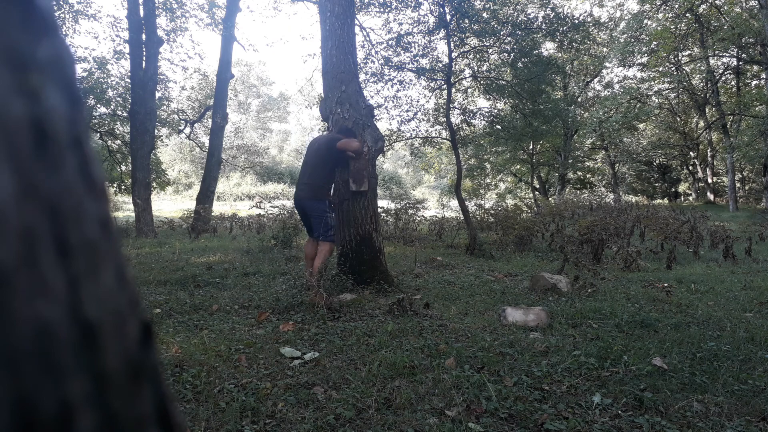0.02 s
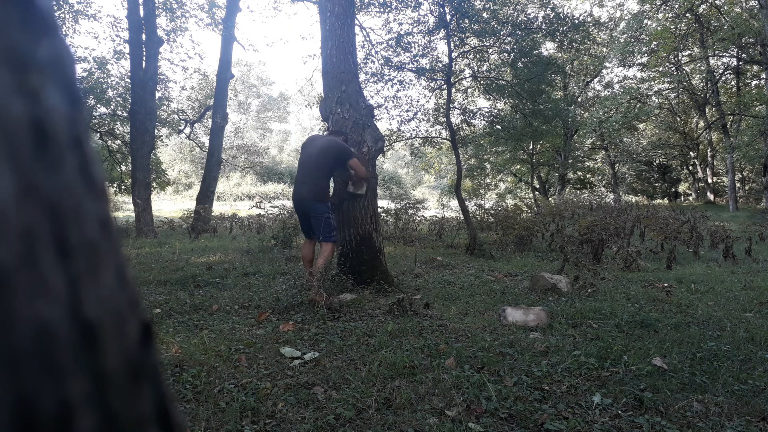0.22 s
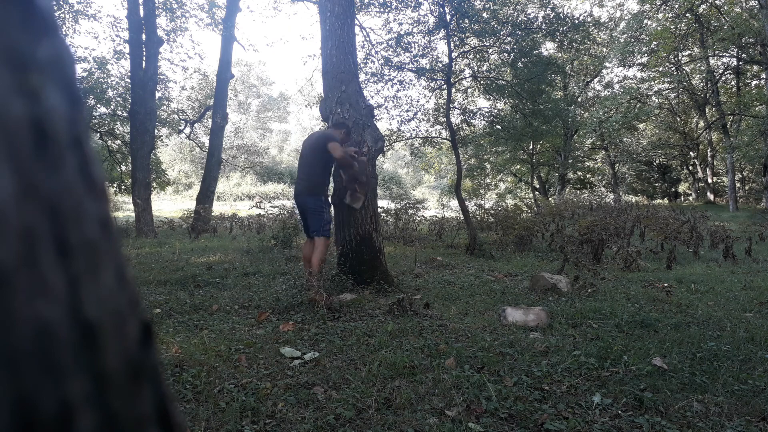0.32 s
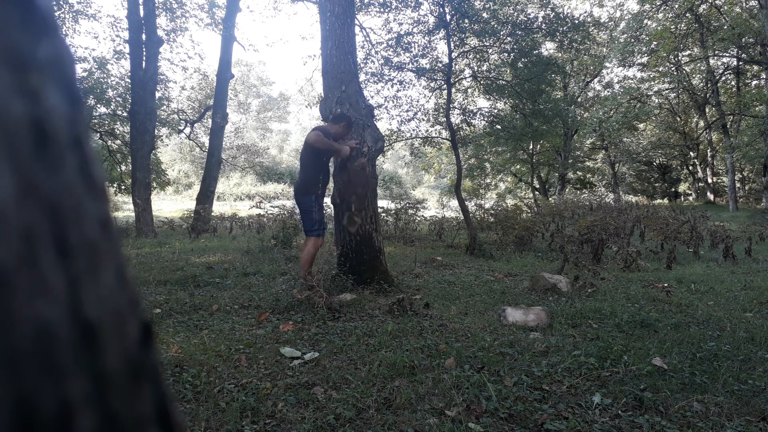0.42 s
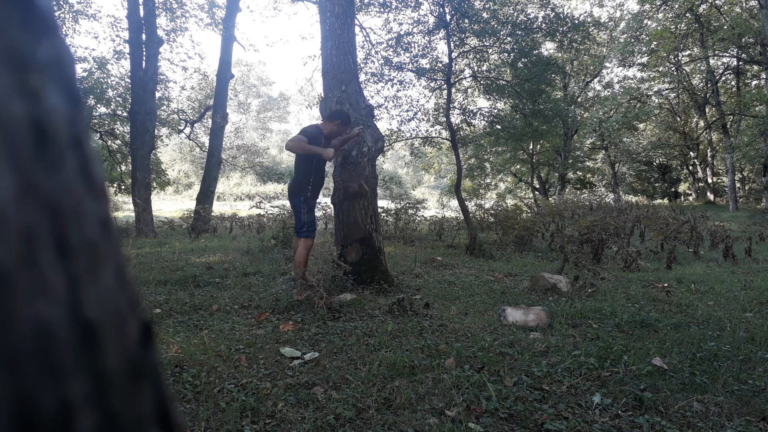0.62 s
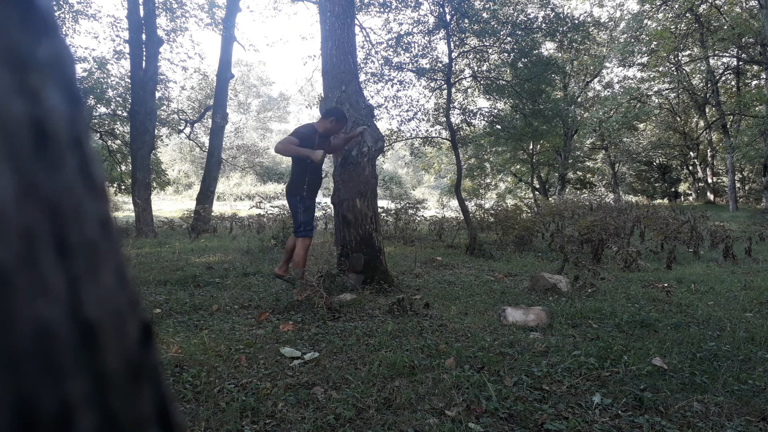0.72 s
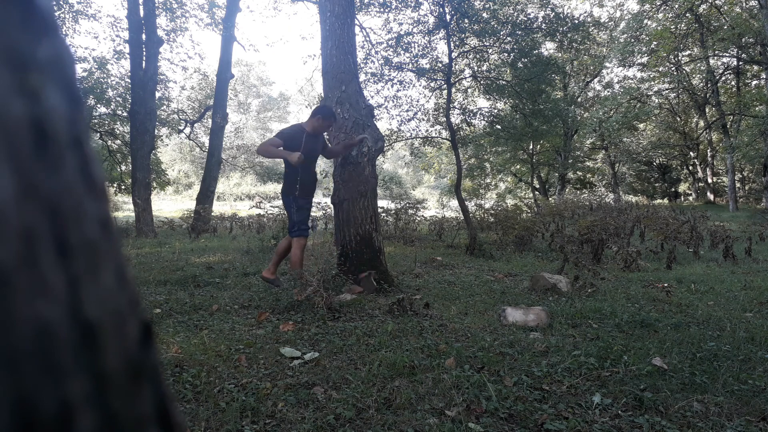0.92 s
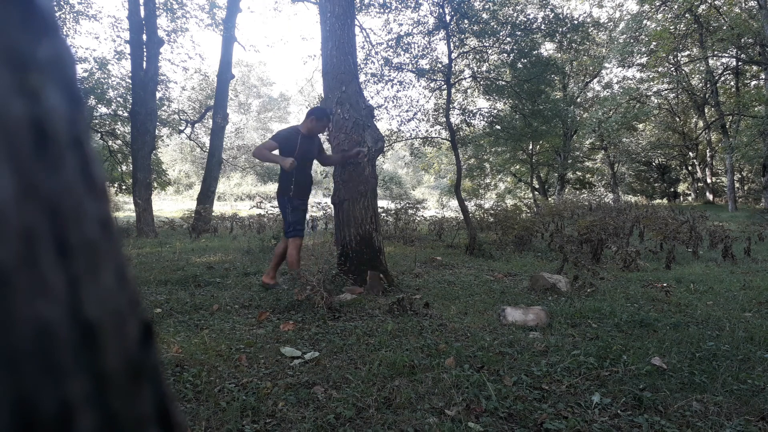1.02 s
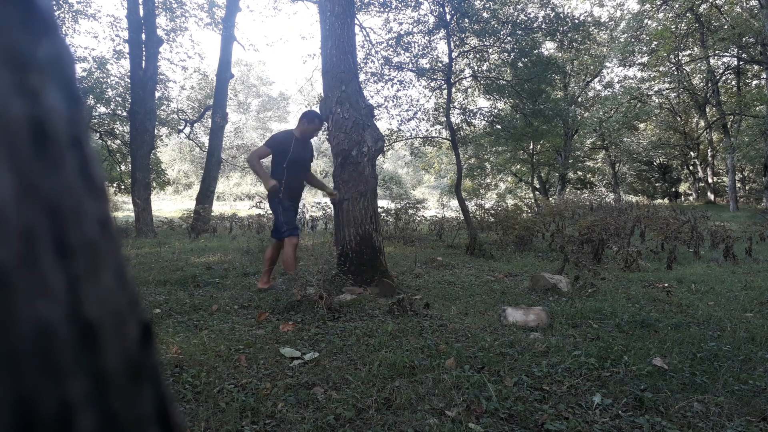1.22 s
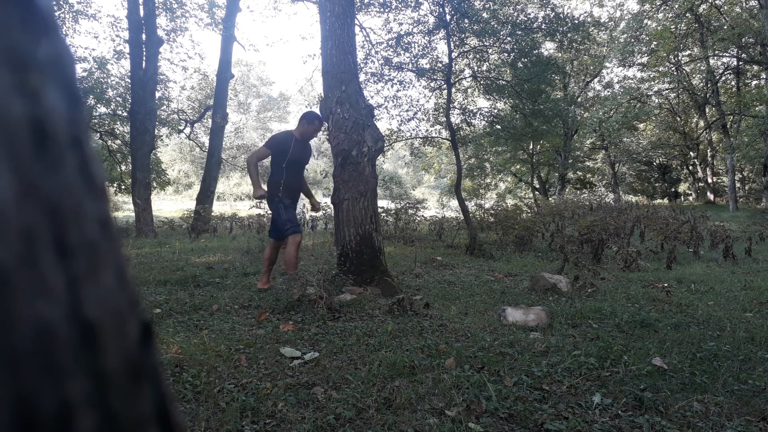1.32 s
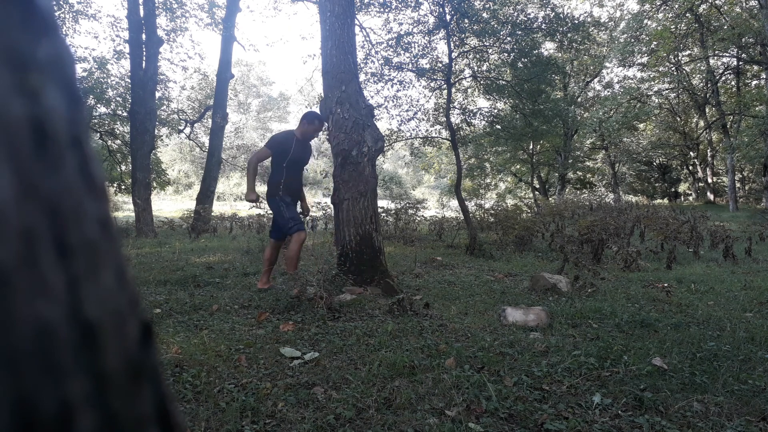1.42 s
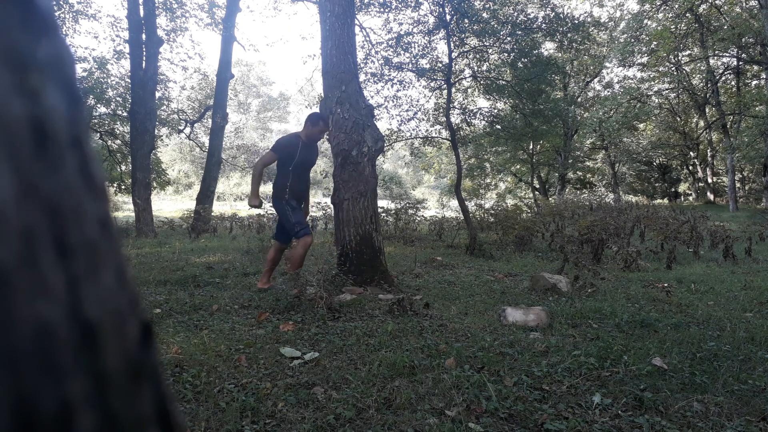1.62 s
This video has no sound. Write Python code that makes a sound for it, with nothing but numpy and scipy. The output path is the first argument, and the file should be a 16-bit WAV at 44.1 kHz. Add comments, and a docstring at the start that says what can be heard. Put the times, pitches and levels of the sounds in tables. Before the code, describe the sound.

Dry wood splits with a hard crack, echoing in the forest, then cracks again amid rustling leaves

```python
"""In a forest, dry wood is struck and splits at a tree trunk. Breaking fibres crack, splinters tick, a loose
wooden piece knocks and clatters, chips thud on the ground and leaves rustle underfoot.
Cracks, ticks, taps and thuds are short dying tones mixed with noise; the loose piece rings a fixed set of tones.
Leaves are crackling noise. The trees return a long, scattered echo over a faint outdoor hush with a low rumble."""
import sys
import numpy as np
from scipy import signal
from scipy.fft import rfft, irfft, next_fast_len
from scipy.io import wavfile

SR = 44100
rng = np.random.default_rng(int(sys.argv[2]) if len(sys.argv) > 2 else 0)


def elevation(decibels):
    """Turn decibel levels (scalar or array-like) into linear amplitude ratios."""
    levels = np.asarray(decibels, float)
    return 10 ** (levels / 20)


def wav_record(signal):
    """Record a signal, one row per channel, as 16-bit PCM in the file named by sys.argv[1]."""
    frames = np.transpose(np.atleast_2d(signal))
    bounded = np.clip(frames, -1, 1)
    # unit amplitude maps onto the largest positive 16-bit level
    quanta = np.round(bounded * 32767).astype(np.int16)
    wavfile.write(sys.argv[1], SR, quanta)


N = 74970  # length [samples], 1.7 s


def unit(x):
    """Scales a sound to an average (rms) strength of 1."""
    return x / np.sqrt(np.mean(x ** 2) + 1e-20)


def along(points, hz):
    """Reads a curve of (frequency, value) points, with frequency on a log axis."""
    point_hz, values = np.transpose(points)
    return np.interp(np.log(hz + 1), np.log(point_hz + 1), values)


def filtered(x, response):
    """Multiplies each frequency of a sound by response(frequency)."""
    m = next_fast_len(x.shape[-1] + 8192)
    spectrum = rfft(x, m) * response(np.fft.rfftfreq(m, 1 / SR))
    return irfft(spectrum, m)[..., :x.shape[-1]]


def coloured_noise(noise, colour):
    """Noise with its tone shaped by a curve in dB, then scaled to rms 1."""
    return unit(filtered(noise, lambda hz: elevation(along(colour, hz))))


def level_curve(points):
    """Loudness at every sample, drawn in straight dB lines between (time, level) points."""
    times, levels = np.transpose(points)
    return elevation(np.interp(np.arange(N) / SR, times, levels))


def add(track, s, sound):
    """Mixes a sound into the track at time s, cut off at the track's end."""
    part = track[round(s * SR):][:len(sound)]
    part += sound[:len(part)]


def bursts(rows, rough, spread, rise_cycles):
    """Each row is a dying swing at its pitch, partly replaced by noise spread around that pitch."""
    all_noise_hz = 11000  # higher pitches hold more noise; from here at the latest they are all noise
    out, t = np.zeros(N), np.arange(4096) / SR
    noises = rng.standard_normal((len(rows), len(t)))
    for (s, db, hz, t60), noise in zip(rows, noises):

        def around_pitch(f):
            width = f * hz * spread
            return (width / np.abs(hz * hz - f * f + 1j * width)) ** 1.63

        hiss = unit(filtered(noise, around_pitch))
        share = np.clip(rough + hz / all_noise_hz, 0, 1)
        swing = np.sqrt(1 - share) * np.sin(2 * np.pi * hz * t) + np.sqrt(share / 2) * hiss
        rise = (1 - np.exp(-t * hz / rise_cycles)) ** 2
        add(out, s, elevation(db - 60 * t / t60) * rise * swing)
    return out


def cracks():
    """Fibres break: each gives a sudden swing that dies within milliseconds."""
    # breaking fibres: (time [s], level [dB], pitch [Hz], time to fall 60 dB [s])
    fibres = [(.2369, -13, 850, 0.0045), (.2385, -7, 2620, 0.0073), (.2398, 11, 2690, 0.0058),
              (.2405, 2.5, 1111, 0.015), (.2417, -9.5, 3950, 0.018), (.2427, 3, 1080, 0.015),
              (.2440, -7, 3140, 0.019), (.2445, -14, 7340, 0.022), (.2480, -9, 1296, 0.032),
              (.2490, -34, 4300, 0.0089), (.2495, -20, 7200, 0.0093), (.2521, -8, 880, 0.028),
              (.2562, -10.5, 1573, 0.035), (.2422, -12, 4340, 0.0067), (.2500, 0, 1430, 0.018),
              (.2515, -12, 3580, 0.0072), (.2528, -4, 2940, 0.0059), (.2545, 0, 1485, 0.0083),
              (.2580, -9.5, 3760, 0.013), (.2595, -1.5, 1560, 0.0096), (.2607, -8, 2750, 0.016),
              (.2650, -20, 2890, 0.045), (.2710, -13.5, 1460, 0.016), (.2830, -15, 1440, 0.012),
              (.3030, -22.5, 1050, 0.009), (1.0066, -12.5, 7360, 0.016), (1.0074, -12.5, 2270, 0.011),
              (1.0076, -20, 3300, 0.0059), (1.0075, -14.5, 10730, 0.016), (1.0075, -13, 5020, 0.0055),
              (1.0070, -23, 506, 0.044), (1.0072, -21, 704, 0.04), (1.0120, -13.5, 724, 0.018),
              (1.0110, -13.5, 3570, 0.0091), (1.0130, -23.5, 7040, 0.06), (1.0180, -23, 7900, 0.014),
              (1.0180, -19.5, 4380, 0.015), (1.0172, -13, 685, 0.018), (1.0178, -16, 2830, 0.018),
              (1.0175, -17, 513, 0.041), (1.0220, -18.5, 756, 0.011), (1.0515, -32, 5900, .02),
              (1.0790, -28.5, 6340, 0.039), (1.0830, -30, 3400, 0.041), (1.0940, -23.5, 3220, 0.046),
              (1.0230, -30, 3470, 0.045), (1.0520, -18, 1586, 0.022), (1.0612, -28, 1540, 0.1),
              (1.0760, -19, 1326, 0.024), (1.0795, -13.5, 1370, 0.033), (1.0805, -20.5, 4060, .02),
              (1.0865, -13, 1480, 0.011), (1.0908, -12.5, 1320, 0.024), (1.0925, -22, 3930, 0.032),
              (1.0990, -27.5, 1630, 0.029), (1.1100, -35, 1490, .02), (1.1260, -33, 1235, 0.0076),
              (1.6910, -35, 1436, 0.06), (1.6935, -30.5, 4360, 0.025), (1.6932, -29.5, 3180, 0.015),
              (1.6945, -37.5, 7000, 0.019), (1.6945, -31, 914, 0.01), (1.6985, -24.5, 833, 0.025)]
    return bursts(fibres, rough=0.12, spread=1.1, rise_cycles=0.35)


def ticks():
    """Splinters and twigs tick: small, mostly high swings with more noise in them."""
    # ticking splinters and twigs: (time [s], level [dB], pitch [Hz], time to fall 60 dB [s])
    splinters = [(.5560, -36.5, 5900, 0.014), (.5721, -32, 2760, 0.013), (.5725, -37, 8500, 0.011),
                 (.6100, -73.5, 7900, 0.012), (.6379, -31, 4280, .012), (.6565, -27.5, 9100, 0.024),
                 (.6725, -35, 7840, 0.0066), (.6745, -37, 3970, 0.035), (.6880, -29.5, 10900, .01),
                 (.7303, -41, 10800, 0.025), (.7308, -50, 5950, 0.023), (.6385, -28.5, 8300, 0.0042),
                 (.8700, -28, 2490, 0.014), (.7830, -37, 1180, 0.0062), (.7840, -35, 4500, 0.035),
                 (.7505, -36.5, 6500, 0.068), (.7730, -36, 8700, 0.038), (.7930, -28, 5790, 0.0084),
                 (.8240, -36, 5020, 0.037), (.8400, -31.5, 8700, 0.017), (.8520, -34, 5950, 0.052),
                 (.8695, -18.5, 3700, 0.0052), (.8735, -29, 6050, 0.023), (.9050, -51, 6870, 0.027),
                 (.9208, -22.5, 6500, 0.011), (.9215, -27.5, 3930, 0.016), (.9890, -40, 8400, .012),
                 (1.1700, -33.5, 11000, 0.047), (1.2250, -39, 13100, 0.023), (1.2900, -33, 8800, 0.015),
                 (1.3000, -28, 3000, 0.0058), (1.3430, -33.5, 9100, 0.019), (1.3490, -27.5, 6800, 0.0099),
                 (1.3570, -26.5, 9700, 0.005), (1.3670, -33, 7560, 0.013), (1.4960, -37, 8200, 0.0085),
                 (1.5300, -53, 6400, 0.015), (1.5440, -40.5, 6850, 0.012), (1.5880, -41, 7460, 0.018),
                 (1.6270, -45.5, 8120, 0.0071), (1.6635, -40, 6200, 0.012)]
    return bursts(splinters, rough=0.25, spread=1.4, rise_cycles=0.35)


def taps():
    """Wood taps dryly on wood: very short, noisy swings with a quick start."""
    # single taps: (time [s], level [dB], pitch [Hz], time to fall 60 dB [s])
    dry_taps = [(.7825, -18, 870, 0.0071), (.8520, -22, 890, 0.0046), (1.0503, -22, 880, 0.0039),
                (1.0703, -12.5, 980, 0.0051), (1.4510, -29, 890, 0.0047)]
    return bursts(dry_taps, rough=0.3, spread=1.7, rise_cycles=0.083)


def loose_piece():
    """A loose piece rings the same tones at every knock, strongest near the pitch that knock favours."""
    # tones of the piece: (pitch [Hz], relative level [dB], time to fall 60 dB [s])
    piece_tones = [(1300, 7.5, 0.071), (1480, 1.5, 0.084), (2130, -3.5, 0.1), (3050, 3.5, 0.069),
                   (3630, 0, 0.061), (4250, 1.5, 0.065), (8700, -23, 0.025)]
    # knocks on the piece: (time [s], level [dB], favoured pitch [Hz])
    knocks = [(0.572, -54, 4000), (.6820, -39, 1264), (.6820, -37.5, 2310), (.7511, -49.5, 3070),
              (.8740, -41.5, 3800), (1.0540, -38, 4250), (1.08, -27, 4250), (.5570, -61, 8700),
              (0.5715, -20, 8700), (.7850, -37, 2120), (.7860, -43.5, 1480), (0.791, -43.5, 3080),
              (.8010, -47, 3060), (.8550, -43, 2050), (0.858, -47, 3050), (0.853, -42, 1530),
              (0.939, -36, 3360), (0.95, -34, 3160), (0.957, -39, 3060), (1.027, -34, 1720),
              (1.3450, -44, 3750), (1.4515, -40, 4170), (1.4520, -42, 1560)]
    favour_db_per_octave, luck_db = 30, 2.1  # drop away from the favoured pitch; random spread of each tone
    out, t = np.zeros(N), np.arange(8192) / SR
    all_luck = rng.standard_normal((len(knocks), len(piece_tones)))
    for (s, db, near_hz), luck in zip(knocks, all_luck):
        ring = np.zeros(len(t))
        for (hz, tone_db, t60), r in zip(piece_tones, luck):
            octaves_away = abs(np.log2(hz / near_hz))
            start_db = tone_db + luck_db * r - favour_db_per_octave * octaves_away
            ring += elevation(start_db - 60 * t / t60) * np.sin(2 * np.pi * hz * t)
        soft_start = 1 - np.exp(-t / 0.0013)
        add(out, s, elevation(db) * ring * soft_start)
    return out


def thuds():
    """Dull knocks and chips landing: mostly low swings, blurred with noise."""
    # dull knocks and thuds: (time [s], level [dB], pitch [Hz], time to fall 60 dB [s])
    dull_knocks = [(.2385, -31, 70, .025), (.2500, -36, 375, 0.15), (.2750, -27.5, 191, 0.077),
                   (.2760, -29.5, 390, 0.047), (.5400, -42.5, 780, 0.026), (.6560, -43.5, 285, 0.047),
                   (.3300, -43, 195, 0.04), (1.1260, -36.5, 324, .02), (1.6925, -33, 572, 0.086),
                   (.2600, -29, 376.6, 0.14), (.9350, -38, 670, 0.065), (.9450, -34, 684, 0.054),
                   (.9460, -40.5, 1190, 0.044), (1.0200, -46, 109, 0.051), (1.0850, -31, 188, 0.083),
                   (1.2140, -35.5, 184, 0.083), (1.2790, -42, 162, 0.1)]
    return bursts(dull_knocks, rough=0.36, spread=1.0, rise_cycles=0.17)


def trees(x):
    """Many trunks scatter an echo: it swells in, then each frequency dies at its own speed."""
    # how long the echo lasts: (frequency [Hz], time to fall 60 dB [s])
    echo_t60 = [(200, 0.24), (600, 0.87), (1000, 0.76), (1500, 0.81), (2200, 0.77), (4000, 0.69),
                (8000, 0.63), (14000, .3)]
    # how strongly the trees answer, before the late boost: (frequency [Hz], echo level [dB])
    echo_colour = [(100, -44), (500, -22), (900, -25), (1200, -19), (1350, -14), (1500, -7.5), (1620, -16),
                   (1800, -17), (2150, -8), (2600, -19.5), (3500, -15.5), (6000, -13.5), (9000, -16.5),
                   (15000, -21)]
    delay_s, rise_s = 0.011, 0.01
    late_s, late_db = 0.9, 6.5  # sounds after this time echo more strongly
    paths, path_samples = 8, 160  # the sound fades over to the next path every 3.6 ms
    hz, t, z = signal.stft(rng.standard_normal((paths, SR + SR // 2)), SR, nperseg=512)
    shape = elevation(-60 * t / along(echo_t60, hz)[:, None]) * (1 - np.exp(-t / rise_s))
    shape = shape / np.linalg.norm(shape, axis=1, keepdims=True)  # every frequency equally strong
    shape = shape * elevation(along(echo_colour, hz))[:, None]
    tails = signal.istft(z * shape, SR, nperseg=512)[1] / np.sqrt(256)
    turn = np.abs(np.arange(N) / path_samples % paths - np.arange(paths)[:, None])
    shares = np.clip(1 - np.minimum(turn, paths - turn), 0, 1)
    boost = np.where(np.arange(N) > late_s * SR, elevation(late_db), 1)
    echo = signal.fftconvolve(x * shares * boost, tails, axes=1).sum(0)
    return np.pad(echo, (round(delay_s * SR), 0))[:N]


def leaves():
    """Dry leaves rustle: hiss broken into sparse crackles of uneven size."""
    # strength of the rustle: (time [s], level [dB])
    rustle = [(0, -75), (.25, -62.5), (.35, -57), (.48, -55), (.6, -61.5), (.71, -55), (.76, -50),
              (.81, -45), (.86, -43), (.96, -43), (1.12, -58), (1.17, -44), (1.21, -51), (1.26, -56),
              (1.289, -42.5), (1.33, -48.5), (1.35, -45.5), (1.45, -45), (1.548, -51), (1.629, -57.5),
              (1.7, -61.5)]
    # tone of the leaves: (frequency [Hz], relative level [dB])
    leaf_colour = [(800, -17), (2500, -4.5), (4200, -5.5), (8300, -1), (11000, 2), (14000, 0),
                   (16000, -4.5)]
    crackles_per_s, size_db, fade_s = 500, 5, 0.0023  # average rate, spread of size, dying time
    noise, chance, size = rng.standard_normal(N), rng.random(N), rng.standard_normal(N)
    spikes = (chance < crackles_per_s / SR) * elevation(size_db * size)
    crackle = signal.lfilter([1], [1, -np.exp(-1 / (fade_s * SR))], spikes)
    broken_hiss = noise * (0.48 + unit(crackle) * 0.95)
    return level_curve(rustle) * coloured_noise(broken_hiss, leaf_colour)


def hush():
    """Far, steady outdoor noise, and a low rumble that comes and goes."""
    # tone of the steady air: (frequency [Hz], relative level [dB])
    air_colour = [(25, -44), (200, -6.5), (400, 2), (800, 0), (1300, 1.5), (2500, -4.5), (5000, -13),
                  (9000, -15.5), (16000, -28)]
    # strength of the rumble: (time [s], level [dB])
    rumble_course = [(0.0, -62), (0.236, -66), (0.364, -60.5), (0.5, -74.5), (0.658, -68.5), (1.018, -55.5),
                     (1.16, -58), (1.556, -62), (1.7, -66)]
    # tone of the rumble: (frequency [Hz], relative level [dB])
    rumble_colour = [(20, 7), (50, -16), (120, -0.5), (200, -1.5), (350, -9), (600, -40)]
    air = elevation(-58) * coloured_noise(rng.standard_normal(N), air_colour)
    rumble = level_curve(rumble_course) * coloured_noise(rng.standard_normal(N), rumble_colour)
    return air + rumble


def scene():
    """Wood sounds with their echo, over leaves and hush."""
    snaps = cracks() + ticks() + taps()
    no_lows = signal.butter(2, 220, "high", fs=SR, output="sos")  # thins the snaps below 220 Hz
    snaps = signal.sosfilt(no_lows, snaps)
    wood = snaps + loose_piece() + thuds()
    return (wood + trees(wood) + leaves() + hush())[None]


def roll_off(x):
    """The treble ends steeply here."""
    return signal.sosfilt(signal.butter(12, 16510, fs=SR, output="sos"), x)


def record(dry):
    """Microphone colour, soft clipping near full scale, then a steep treble limit."""
    # tone of the microphone: (frequency [Hz], gain [dB])
    mic_colour = [(20, -11), (100, -3.5), (4500, 0.5), (5200, -2), (8600, -1), (9400, -11), (10800, -6),
                  (12300, -13), (13000, -9), (14200, -12.5), (16000, -13)]
    top_hz = 15900
    x = filtered(dry, lambda hz: elevation(along(mic_colour, hz)))
    x = x / (1 + np.abs(x) ** 8) ** (1 / 8)  # rounds off peaks near full scale
    x = filtered(x, lambda hz: 1 / (1 + (hz / top_hz) ** 60))
    mix = np.clip(x, -1, 1)
    return roll_off(mix)


dry = scene()
out = record(dry)
wav_record(out)
```